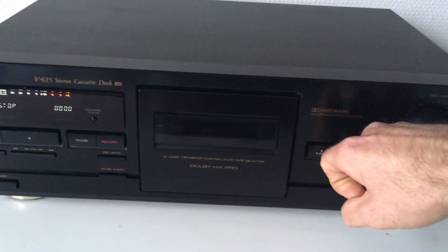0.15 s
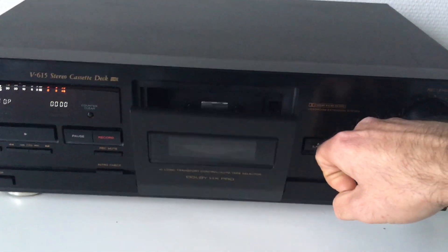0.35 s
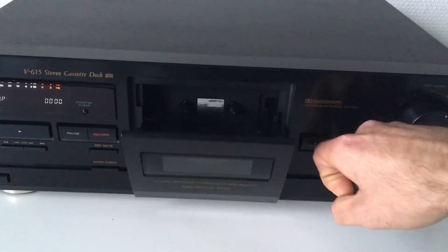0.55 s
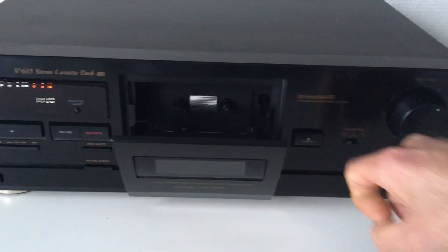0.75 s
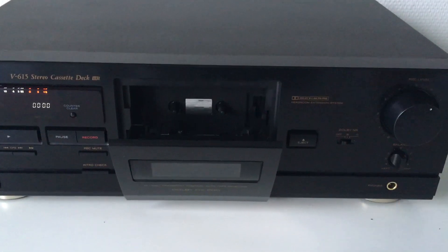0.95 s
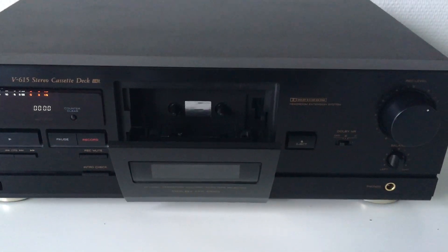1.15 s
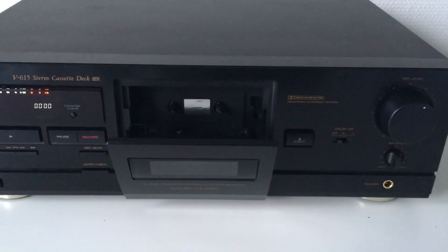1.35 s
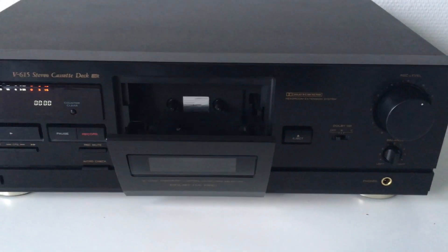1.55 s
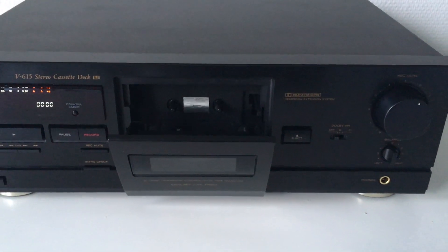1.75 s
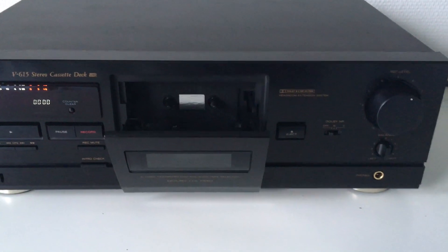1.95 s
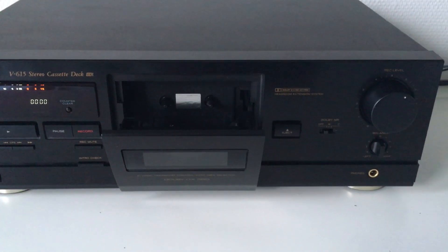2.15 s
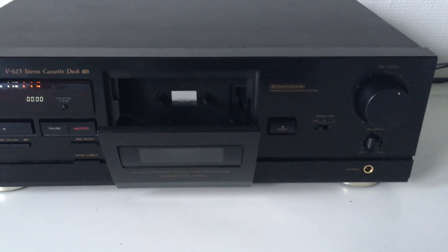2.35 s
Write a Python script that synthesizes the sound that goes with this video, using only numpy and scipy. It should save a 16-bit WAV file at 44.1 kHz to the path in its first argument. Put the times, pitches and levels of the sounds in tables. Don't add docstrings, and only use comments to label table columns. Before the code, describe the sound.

A cassette deck door is ejected: dull button thump, bright latch snap with a tiny spring ring, door knocking against its stop, later a plastic case slides and clicks, close microphone in a small hard room.

```python
import sys
import numpy as np
from scipy import signal
from scipy.fft import rfft, irfft
from scipy.io import wavfile
from scipy.ndimage import uniform_filter1d

SR = 44100
rng = np.random.default_rng(int(sys.argv[2]) if len(sys.argv) > 2 else 0)


def digitize_waveform(pressure):
    field = np.atleast_2d(pressure).T
    bounded = np.clip(field, -1, 1)
    quanta = np.round(bounded * 32767).astype(np.int16)
    wavfile.write(sys.argv[1], SR, quanta)


def voltage_ratio(level):
    return 10 ** (np.asarray(level, float) / 20)


N = 110250
T = np.arange(N) / SR
HZ = np.maximum(np.fft.rfftfreq(N, 1 / SR), 1)
TAP_RISE_S, TAP_SCATTER_DB, TAP_DETUNE = 0.0005, 2.0, 0.01


def unit(x):
    return x / np.sqrt(np.mean(x ** 2))


def colour(x, gain_db):
    return unit(irfft(rfft(x) * voltage_ratio(gain_db), N))


def read(table, hz=HZ):
    table_hz, value = np.array(table).T
    return np.interp(np.log(hz), np.log(table_hz), value)


def octaves(lowest_hz, count):
    centres_hz = lowest_hz * 2.0 ** np.arange(count)
    return [(hz, np.sqrt(np.maximum(1 - np.abs(np.log2(HZ / hz)), 0))) for hz in centres_hz]


def fade(start_s, rise_s, t60_s):
    t = np.maximum(T - start_s, 0)
    return (1 - np.exp(-t / max(rise_s, 1e-5))) * voltage_ratio(-60 * t / t60_s)


def ring(start_s, modes, rise_s, scatter_db, detune=0.0044):
    out = np.zeros(N)
    luck = rng.standard_normal((14, 2))
    first = int(np.ceil(max(start_s, 0) * SR))
    t = T[first:first + SR] - start_s
    total = 0
    for (hz, db, t60_s), (level_luck, pitch_luck) in zip(modes, luck):
        decay = voltage_ratio(db + scatter_db * level_luck) * np.exp(-np.log(1000) * t / t60_s)
        total = total + decay * np.sin(2 * np.pi * hz * (1 + detune * pitch_luck) * t)
    out[first:first + SR] = (1 - np.exp(-t / max(rise_s, 1e-5))) * total
    return out


def walk(rate_hz):
    k = int(SR / rate_hz)
    return unit(uniform_filter1d(uniform_filter1d(rng.standard_normal(N), k), k))


def grit(spread_db):
    grain = np.minimum(rng.exponential(size=N), 3.5)
    return rng.standard_normal(N) * voltage_ratio(spread_db * np.repeat(grain, 8)[:N])


# [t/s, level/dB, swell/s, favoured f/Hz]
THUDS = [(-.03, -29.5, 0.007, 227), (0.201, -20.5, 0.017, 247), (0.2195, -21.5, 0.012, 239),
         (0.256, -49, 0.011, 225), (0.3136, -32.5, 0.002, 255), (.325, -21, 0.0062, 229),
         (.342, -33, 0.0081, 235), (.41, -32.5, 0.004, 260), (0.466, -35, 0.007, 250),
         (0.5393, -21.5, 0.011, 268), (0.547, -30.5, 0.0059, 288), (0.579, -33, .006, 200),
         (.607, -33, 0.002, 234), (.62, -33, 0.0029, 227), (.64, -35, 0.0072, 219),
         (0.699, -45, 0.0098, 208), (0.741, -42, 0.013, 245)]
# [f/Hz, level/dB, t60/s]
CABINET = [(206, -2.5, .14), (244, -10, .16), (258, 0, .1), (305, -12, .14)]
# [f/Hz, level/dB, t60/s]
TABLE = [(112.3, -20.5, 0.565), (127.2, -18, 0.57)]
# [t/s, level/dB, favoured f/Hz]
KNOCKS = [(-.03, -27.5, 904), (.2, -36.5, 810), (.207, -43.5, 790), (.3128, -37.5, 850),
          (.3155, -32.5, 615), (.3225, -29.5, 920), (.345, -40.5, 580), (.415, -46, 1470),
          (.539, -39, 1160), (.5435, -39.5, 850), (0.547, -39, 1420), (0.577, -43, 450), (0.595, -40, 1416),
          (.6, -33, 1200), (.605, -35, 2080), (.609, -41, 764), (.635, -41, 680), (.7, -49.5, 796)]
# [f/Hz, level/dB, t60/s]
PANEL = [(380, -4, 0.043), (428.7, 0.5, 0.1), (490, -7.5, 0.24), (571, -4.5, 0.071), (695.6, -13.5, 0.13),
         (796, -5, 0.068), (847, -2.5, 0.041), (934.6, -1, 0.048), (1103, -16, 0.11), (1200, -3, 0.02),
         (1432, -6.5, 0.052), (1700, -10, 0.084), (2022, -5.5, 0.056), (2460, -12, 0.03)]


def deck():
    out = 0
    for s, db, swell_s, near_hz in THUDS:
        modes = [(hz, d - 40 * np.log2(hz / near_hz) ** 2, t60_s) for hz, d, t60_s in CABINET]
        cabinet = ring(s, modes, swell_s, scatter_db=1, detune=0)
        table = ring(s, TABLE, rise_s=0.1, scatter_db=5.3, detune=0.024)
        out = out + voltage_ratio(db) * (cabinet + table)
    for s, db, near_hz in KNOCKS:
        modes = [(hz, d - 22 * np.log2(hz / near_hz) ** 2, t60_s) for hz, d, t60_s in PANEL]
        out = out + voltage_ratio(db) * ring(s, modes, TAP_RISE_S, TAP_SCATTER_DB, TAP_DETUNE)
    return out


# (t/s, f/Hz, level/dB, t60/s)
TONGUE = (.3124, 12700, -29, .014)


def latch():
    return ring(TONGUE[0], [TONGUE[1:]], TAP_RISE_S, scatter_db=0)


# [f/Hz, level/dB, t60/s]
SPRING = [(8463, 0, .012), (8473, -27, .3), (8613, -25, .28), (8660, -27, .22), (8753, -8, .025),
          (8390, -29, .2), (8850, -28, .15), (5819, -31, .15), (6255, -31, .15)]
# [t/s, level/dB]
SPRING_BLOWS = [
    (.3175, -19.5),
    (.31898, -17),
]


def latch_spring():
    return sum(voltage_ratio(db) * ring(s, SPRING, rise_s=0.00013, scatter_db=0, detune=0) for s, db in SPRING_BLOWS)


# [t/s, level/dB, t60/s, centre f/Hz,
# width/octaves]
BURSTS = [(0.199, -66, 0.36, 2200, 1.4), (0.241, -56, 0.086, 6950, 6.3), (0.314, -28.5, 0.045, 3550, 1.6),
          (0.3138, -31, 0.043, 7000, 2.9), (0.322, -32, 0.034, 2970, 0.63), (0.418, -51, 0.019, 1790, 0.5),
          (0.539, -55, 0.21, 3940, 1.2), (.593, -36, 0.0061, 4870, 1.2), (0.599, -41, 0.054, 4130, 1.12),
          (0.71, -58, 0.031, 6300, 0.54), (1.636, -58, 0.11, 2480, 1.1), (1.649, -50.5, 0.054, 9000, 5.8),
          (2.013, -46, 0.038, 3900, 1.2), (2.0776, -28.5, 0.013, 6700, 2.3), (2.082, -35, 0.042, 7000, 2.4),
          (2.118, -61, 0.049, 5850, 1.4), (2.183, -48.5, 0.08, 7050, 1.1), (2.268, -95, 0.07, 8200, 0.47),
          (0.3115, -40, 0.1, 2330, 1.9), (0.315, -55, 0.41, 3380, 0.2), (.330, -51, 2.5, 57.3, 0.1),
           (0.539, -38, 0.11, 970, .8), (0.595, -40, 0.055, 1670, 1.04), (0.596, -47.5, 0.33, 1730, 0.83),
           (1.636, -54, 0.19, 405, 0.093), (1.691, -51, 0.092, 950, 0.46), (2.082, -49, 0.34, 800, 0.2),
           (2.1845, -39.5, 0.045, 1770, 0.5), (2.21, -48.5, 0.26, 1610, 0.37),
           (2.222, -56, 0.19, 407, 0.084)]


def cracks():
    out = 0
    for s, db, t60_s, hz, wide_oct in BURSTS:
        band_db = np.maximum(-6 * (np.log2(HZ / hz) / wide_oct) ** 2, -60)
        out = out + voltage_ratio(db) * fade(s, 0.0004, t60_s) * colour(grit(2.2), band_db)
    return out


# [f/Hz, rubbed level/dB, tapped level/dB, t60/s, rubbed hardest t/s]
SHELL = [(757, -9, -10, 0.058, 1.745), (850, 0.5, -7.5, 0.058, 2.018), (1020, 5.5, -2.5, 0.032, 2.07),
         (1176, 2, -5.5, 0.024, 1.55), (1700, -4, -2, 0.038, 1.78), (1844, 1, -12, 0.097, 2.3),
         (2420, -1, 1.5, 0.0084, 1.93), (3157, 2.5, -18, 0.06, 1.77), (3690, 0.5, -18.5, 0.023, 1.81),
         (5340, 1, -11, 0.0088, 1.87), (5700, 2, -23, 0.016, 1.92), (6920, -11, -16.5, 0.017, 1.99),
         (8330, -9, -23, 0.011, 2.07), (9600, 2, -17, 0.0089, 1.83)]
# [t/s, level/dB, tilt/(dB/octave), favoured f/Hz]
TAPS = [(1.641, -51.5, 7, 895), (2.0758, -47, 14, 3540), (2.0796, -30, -2, 940), (2.086, -38, -22, 760),
        (2.106, -42, 10, 770), (2.117, -53.5, 12.5, 2880), (2.155, -50, 12, 800), (2.176, -50, 0, 760),
        (2.1854, -41, 4, 1700), (2.191, -54, 1, 1700), (2.211, -42, -2, 1700), (2.229, -41.5, -9, 890),
        (2.24, -43.5, 0, 1100), (2.253, -53, 2, 1250), (2.274, -53, -9, 1700), (2.481, -46.5, -5, 890)]
# [t/s, level/dB]
SLIDE = [
    (1.672, -70),
    (1.696, -51),
    (1.734, -45.5),
    (1.842, -40),
    (1.93, -41.5),
    (1.962, -39.5),
    (1.995, -48),
    (2.045, -73),
    (2.07, -87),
]
# [t/s, level/dB]
SETTLE = [
    (2.07, -58),
    (2.13, -47.5),
    (2.17, -62.5),
    (2.23, -55.5),
    (2.27, -56.5),
    (2.31, -99),
    (2.40, -101),
]
# [f/Hz, level/(dB/Hz)]
RUB = [(180, -38), (300, -13.5), (787, -6), (1360, -5.5), (2030, -8), (2440, -2.5), (4000, -2.5),
       (9550, -2.5), (16000, -9)]


def cassette():
    GRIT_DB, SHELL_SHARE_DB, SETTLE_TILT_DB = 3, -14.5, -3
    CONTACT_S = 0.075
    rub = grit(GRIT_DB) * voltage_ratio(1.26 * walk(52))

    def level(curve):
        return voltage_ratio(np.interp(T, *np.array(curve).T, left=-120, right=-120))

    def rubbed_mode(hz, t60_s):
        resonance = 1 + 1j * (HZ - hz) * t60_s * np.pi * 2 / np.log(1000)
        return unit(irfft(rfft(rub) / resonance, N))

    shell = 0
    for hz, db, _, t60_s, s in SHELL:
        contact = np.exp(-0.5 * ((T - s) / CONTACT_S) ** 2)
        shell = shell + voltage_ratio(db) * contact * rubbed_mode(hz, t60_s)
    case = voltage_ratio(-17) * rubbed_mode(hz=1730, t60_s=0.022)
    out = (colour(rub, read(RUB)) + voltage_ratio(SHELL_SHARE_DB) * shell + case) * level(SLIDE)
    settle_db = read(RUB) + SETTLE_TILT_DB * np.log2(HZ / 2000)
    out = out + colour(grit(GRIT_DB), settle_db) * level(SETTLE)
    for s, db, tilt_db, near_hz in TAPS:
        modes = [(hz, d + tilt_db * np.log2(hz / 1000) - 8 * abs(np.log2(hz / near_hz)), t60_s)
                 for hz, _, d, t60_s, _ in SHELL]
        out = out + voltage_ratio(db) * ring(s, modes, TAP_RISE_S, TAP_SCATTER_DB, TAP_DETUNE)
    return out


# [t/s, level/dB, rise/s]
SCUFFS = [
    (-.03, -52.5, 0.015),
    (1.295, -46, 0.029),
    (2.47, -58, 0.019),
]
# [f/Hz, level/(dB/Hz)]
SCUFF = [(300, -11), (800, 0.5), (1250, 1), (2500, -3), (4300, -10), (5200, -15), (8000, -25), (12000, -47)]
# [f/Hz, t60/s]
SCUFF_T60 = [(500, 0.32), (1500, 0.63), (3000, 0.47), (6000, 0.35)]


def shoe():
    out = 0
    for s, db, rise_s in SCUFFS:
        spectrum = rfft(colour(grit(1.0), read(SCUFF) - 40 * (HZ < 300)))
        scuff = sum(irfft(spectrum * weight ** 2, N) * fade(s, rise_s, read(SCUFF_T60, hz))
                    for hz, weight in octaves(350, count=6))
        out = out + voltage_ratio(db) * scuff
    return out


def swell(centre_s, length_s):
    return np.exp(-((T - centre_s) / length_s) ** 2)


def footfall():
    thump = colour(rng.standard_normal(N), -12 * np.abs(np.log2(HZ / 56)))
    return voltage_ratio(-57) * swell(centre_s=1.33, length_s=0.11) * thump


def sleeve():
    brush = colour(grit(1.5), -9 * np.abs(np.log2(HZ / 11900)))
    return voltage_ratio(-73) * swell(centre_s=0.92, length_s=0.14) * brush


# [f/Hz, t60/s]
ROOM = [(100, 0.64), (400, 0.63), (1500, 0.48), (4000, 0.37), (10000, 0.26)]


def room(x):
    ROOM_DB, GAP_S = -10, 0.0064
    tail = sum(irfft(rfft(rng.standard_normal(N)) * weight, N) * fade(GAP_S, 0.01, read(ROOM, hz))
               for hz, weight in octaves(56.2, count=9))
    return signal.fftconvolve(x, tail / np.sqrt(np.sum(tail ** 2)))[:N] * voltage_ratio(ROOM_DB)


# [f/Hz, level/(dB/Hz)]
FLOOR = [(25, -42), (40, -5.5), (58, 2), (85, -7.5), (190, -3.5), (480, -17.5), (2500, -28.5),
         (7000, -33.5)]


def floor():
    FLOOR_DB = -60
    spectrum = rfft(rng.standard_normal(N)) * voltage_ratio(read(FLOOR) - 30 * (HZ < 25))
    out = 0
    for hz, weight in octaves(21.6, count=10):
        wander_db = min(1.5, 600 / hz + 1.8) * walk(0.82)
        out = out + irfft(spectrum * weight ** 2, N) * voltage_ratio(wander_db)
    return voltage_ratio(FLOOR_DB) * unit(out)


def scene():
    SPRING_WET_DB = -6
    near = deck() + latch() + cracks() + cassette()
    spring = latch_spring()
    wet = room(near + voltage_ratio(SPRING_WET_DB) * spring)
    far = shoe() + footfall() + sleeve()
    return (near + spring + wet + far + floor())[None]


def band_limit(x):
    return signal.sosfilt(signal.butter(12, 16820, fs=SR, output="sos"), x)


# [f/Hz, level/dB]
MIC = [(4000, -0.5), (5000, -4.5), (6500, 0), (9500, -0.5), (10500, -3), (11500, 1.5), (14000, 2.5)]


def record(dry):
    TOP_HZ = 15950
    response_db = read(MIC) - 86 * (HZ > TOP_HZ)
    mix = irfft(rfft(dry) * voltage_ratio(response_db), N)
    return band_limit(mix)


dry = scene()
out = record(dry)
digitize_waveform(out)
```